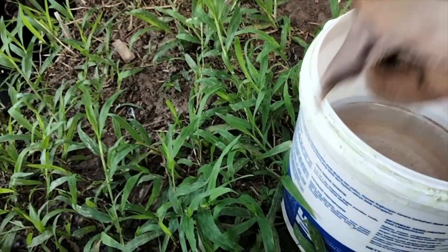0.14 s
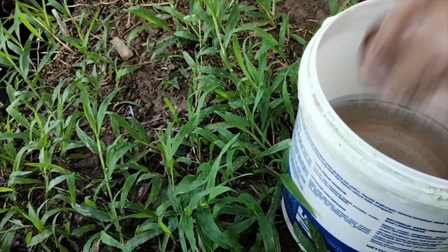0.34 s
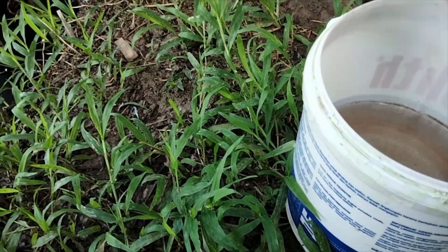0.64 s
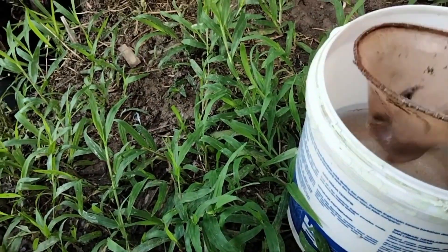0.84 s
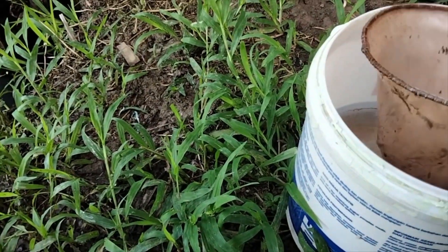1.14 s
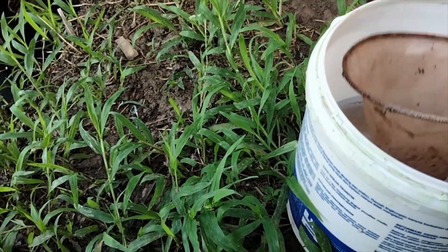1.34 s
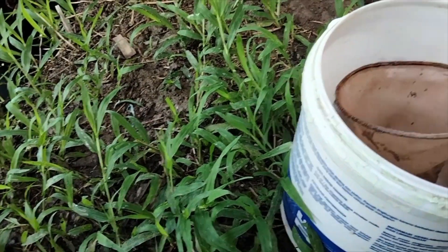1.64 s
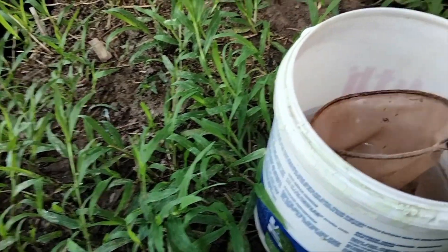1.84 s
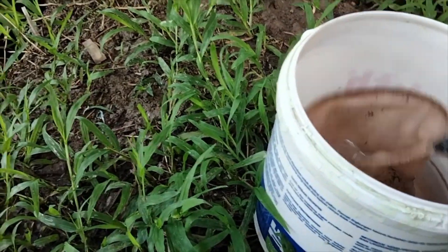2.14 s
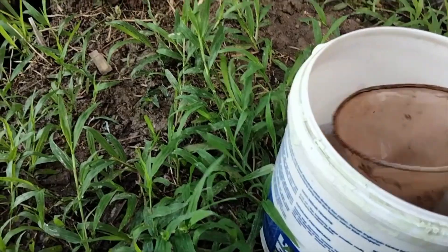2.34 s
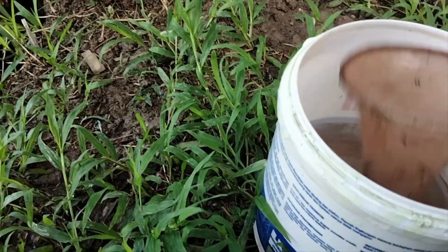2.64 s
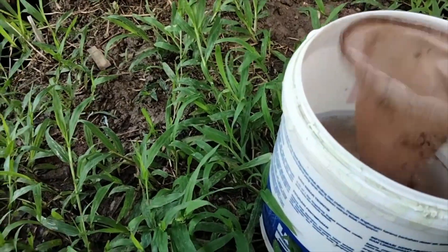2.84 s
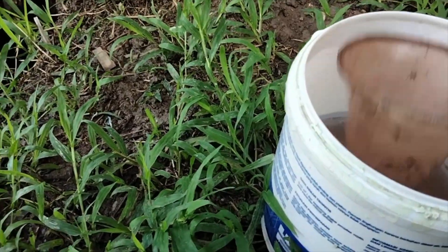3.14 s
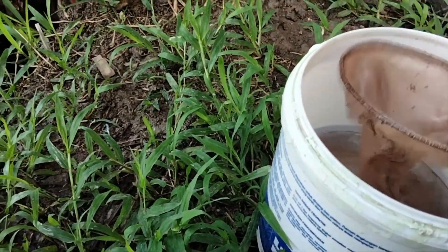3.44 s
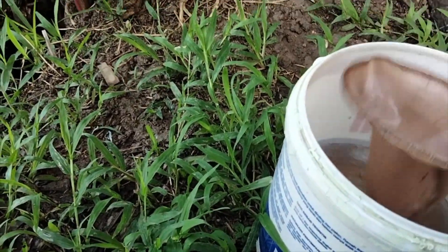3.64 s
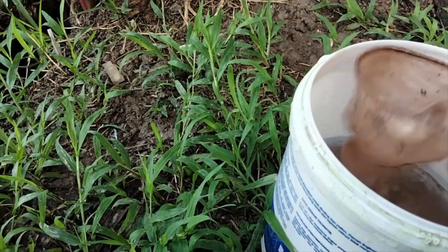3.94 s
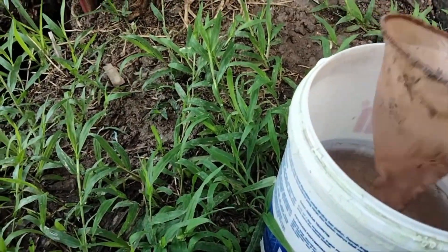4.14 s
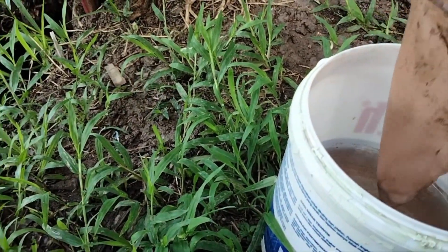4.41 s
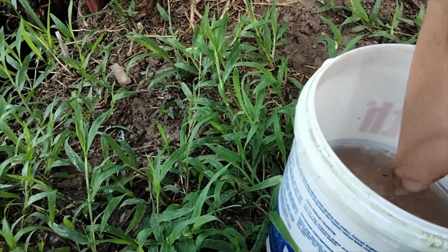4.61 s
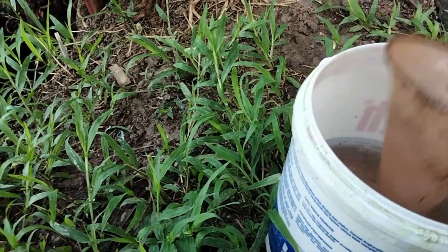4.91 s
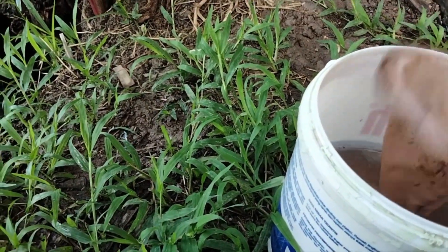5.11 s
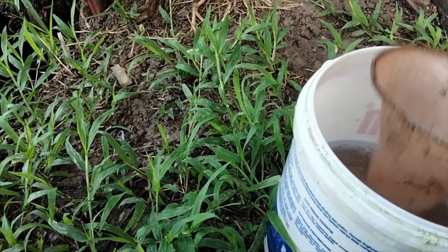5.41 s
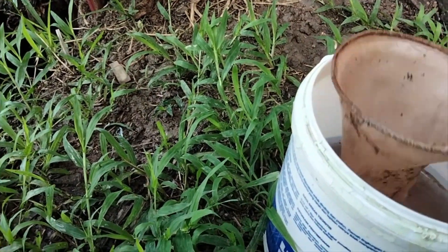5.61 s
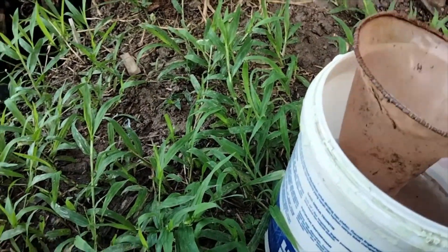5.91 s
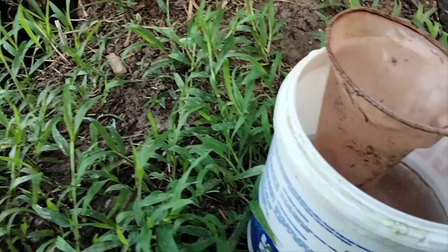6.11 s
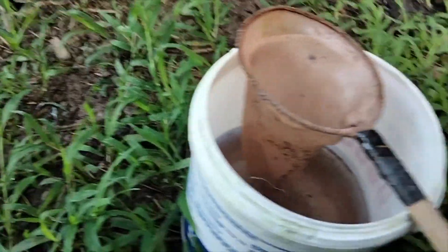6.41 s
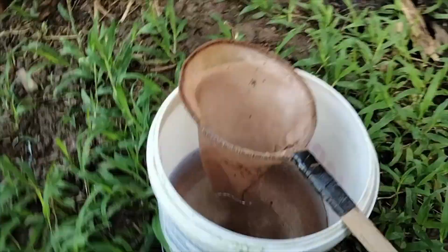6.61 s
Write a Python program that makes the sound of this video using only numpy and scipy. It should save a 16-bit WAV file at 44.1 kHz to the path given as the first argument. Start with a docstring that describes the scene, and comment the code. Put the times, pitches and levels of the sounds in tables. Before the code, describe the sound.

Dry wooden knocks with a slight plastic boom come in uneven clusters, strongest early, just before three seconds and near five. Bright little water ticks and rising plinks fill the middle, with grainy wet rustling. A shrill cicada chorus never stops; a closer singer pulses about seven times a second, then cuts out. Low far traffic lies beneath. Close, mono, open-air phone sound with brittle treble, ending in a thin watery hiss.

```python
"""Net in a plastic bucket, cicadas around

Outdoors, close to the microphone, a fine-mesh net on a wooden handle is dipped and shaken in a plastic bucket.
The handle knocks on the rim as decaying modes and noise bursts; drops tick off the mesh as rising plinks and
spray; the wet cloth rustles and scuffs as grainy noise. Cicadas, shaped noise and tymbal clicks, buzz all around,
one close and throbbing, over the low noise of far traffic. A mono phone microphone with a treble resonance.
"""
import sys
import numpy as np
from scipy import signal
from scipy.fft import rfft, irfft, next_fast_len
from scipy.io import wavfile
from scipy.ndimage import uniform_filter1d, map_coordinates

SR = 44100
rng = np.random.default_rng(int(sys.argv[2]) if len(sys.argv) > 2 else 0)


def wav_record(signal):
    """Record a signal, one row per channel, as 16-bit PCM in the file named by sys.argv[1]."""
    frames = np.transpose(np.atleast_2d(signal))
    bounded = np.clip(frames, -1, 1)
    # unit amplitude maps onto the largest positive 16-bit level
    quanta = np.round(bounded * 32767).astype(np.int16)
    wavfile.write(sys.argv[1], SR, quanta)


N = 297884

# Handle on the rim. Each row: start in seconds, wall thud in dB, bending mode 1 in dB, mode 2 in dB,
# share of mode 2 across the edge (0-1), mode 3 in dB, crack in dB.
RIM_KNOCKS = [(0.138, -107, -71, -63, 0.8, -48.5, -70), (0.339, -38, -28.5, -20, 1, -26, -42.5),
              (0.387, -58, -40, -40.5, .99, -48, -73), (0.782, -58, -42.5, -60, 0.5, -69, -68),
              (0.812, -48, -44, -70, .6, -68, -56), (2.102, -55.5, -42.5, -98, .85, -45, -68),
              (2.157, -48, -37, -66, .1, -40, -45.5), (2.204, -61, -59, -53, .98, -45, -57),
              (2.301, -41.5, -34, -33, 0.64, -37, -44.5), (2.639, -78, -46.5, -61, .75, -72, -64),
              (2.671, -78, -53, -53, 0.9, -49, -71), (2.717, -51.5, -33.5, -40, 0.97, -45, -57),
              (2.83, -58, -45, -42, 0.6, -42, -68), (2.874, -31.5, -26.5, -20.5, 0.73, -34, -41),
              (2.976, -71, -54, -51, .8, -51, -71), (3.258, -54.5, -40.5, -51, 0.9, -46, -56.5),
              (3.328, -76, -52, -53, .98, -42.5, -57), (3.36, -92, -47, -62, .8, -75, -68),
              (3.807, -36.5, -33.5, -36, 0.95, -20.5, -43.5), (3.823, -41.5, -32, -21, 0.96, -27, -37.5),
              (3.911, -43.5, -40.5, -29, 1, -20, -60.5), (4.73, -83.5, -83, -67.5, 0.7, -42, -58),
              (4.776, -33, -18.5, -15, 0.93, -17.5, -28.5), (4.954, -38.5, -28, -22, 0.93, -28, -42.5),
              (5.126, -36, -23.5, -17, 0.6, -43, -27), (5.172, -53, -32.5, -32.5, 0.25, -56, -36),
              (5.274, -36, -20, -19, 1, -24, -26.5), (5.752, -53, -51, -64, 0.1, -73, -59)]
# Bending modes of the handle: 1, 2 flat, 2 across the edge, 3. Each row: frequency in Hz, t60 in seconds.
HANDLE_MODES = [(474, 0.059), (1140, 0.059), (1250, 0.036), (2020, 0.012)]
# The bucket wall's own modes. Each row: frequency in Hz, t60 in seconds, level in dB.
WALL_MODES = [(236.4, 0.08, -0.8), (952, 0.026, -1)]
# Dull push of the plastic wall. Each row: frequency in Hz, level in dB.
THUD_SPECTRUM = [(200, -1.5), (350, -14.5), (800, -7), (1500, -14), (2500, -20)]
# Crack of the contact. Each row: frequency in Hz, level in dB.
CRACK_SPECTRUM = [(1200, -24.5), (1900, -3.5), (2700, 0), (3400, 0.5), (4100, 3), (4900, -2.5),
                  (5800, -8.5), (7400, -2), (11000, -30)]
# Treble of the crack, also the mist of a drop. Each row: frequency in Hz, level in dB.
SNAP_SPECTRUM = [(4300, -29), (5600, -1), (6500, -2), (8000, 1), (12000, -6.5), (16000, -1.5)]
WALL_DB, WALL_GROWS = -47.5, .4  # wall modes at a thud of -50 dB; dB per dB of thud
SNAP_DB, SNAP_GROWS, SNAP_LEAST_DB = -49.5, 2.33, -58  # snap at a crack of -40 dB; dB per dB of crack; softest
TICK_DB = 4  # first contact over the crack

# Drops flicked off the mesh. Each row: start in seconds, level in dB, starting pitch in Hz, mist in dB.
MESH_DROPS = [(0.362, -58, 6540, -50.5), (0.7366, -54.5, 4450, -53.5), (0.8015, -47.5, 3900, -53),
              (0.867, -59, 3600, -70), (1.1401, -76, 6480, -70), (1.345, -64, 5000, -72),
              (1.359, -65, 4520, -72), (1.374, -54, 1520, -73), (1.4, -72, 6000, -69),
              (1.415, -73, 6000, -72), (1.4682, -60, 4410, -65), (1.585, -52.5, 5000, -55),
              (1.593, -63, 4050, -64), (1.811, -45, 4370, -54), (1.926, -71, 6000, -66),
              (2.376, -51.5, 2370, -65), (2.437, -45.5, 3800, -55), (2.5148, -56.5, 1530, -72),
              (2.5625, -40.5, 3850, -49), (2.7117, -38, 3900, -50.5), (2.811, -49, 6540, -53),
              (2.991, -56, 5370, -58), (3.048, -45.5, 3320, -57), (3.09, -59, 3260, -72),
              (3.119, -54.5, 1730, -62), (3.4204, -43.5, 3340, -55), (3.47, -57, 2330, -76),
              (3.503, -67, 4000, -72), (3.558, -57, 2490, -70), (3.583, -63, 3000, -72),
              (3.6297, -42.5, 3880, -60), (3.6727, -55, 3450, -70), (3.6945, -50.5, 1970, -65),
              (3.7107, -56, 5770, -54), (3.761, -60, 5800, -59), (3.9092, -44.5, 2550, -73),
              (3.978, -55, 2960, -63), (4.4752, -72, 6000, -70), (4.72, -54, 2000, -63)]
# Spray of drops and strokes. Each row: frequency in Hz, level in dB.
SPRAY_SPECTRUM = [(800, -8), (1700, -2), (2800, -3), (4000, -3.5), (6500, -7), (10000, -3), (16000, -32)]
PLINK_DB, SPRAY_DB = -2, -8.5  # parts of a drop, relative to its level

# Wet net dragged over the rim. Each row: start in seconds, length in seconds, handle in dB, cloth in dB, fizz in dB.
RIM_SCUFFS = [(0.286, 0.065, -71, -74, -67.5), (0.338, 0.057, -61.5, -66.5, -67),
              (0.74, 0.032, -77, -66, -68), (0.775, 0.06, -72, -59.5, -66), (0.936, 0.026, -70.5, -78, -76),
              (1.49, 0.086, -89, -69.5, -68), (1.852, .1, -76, -71, -71), (2.316, 0.017, -89, -68, -65),
              (2.355, 0.036, -84, -73, -64), (2.794, 0.031, -71, -63.5, -60.5),
              (2.89, 0.078, -89, -67.5, -69), (3.14, 0.026, -72.5, -69, -66.5),
              (3.27, 0.025, -82, -65.5, -67), (3.347, 0.03, -71, -69.5, -70),
              (3.69, 0.041, -68.5, -64.5, -59), (3.735, 0.013, -81, -74, -63),
              (3.856, 0.065, -71, -65.5, -69), (3.908, 0.061, -69, -67, -70), (4.863, 0.021, -65, -88, -83),
              (5.045, 0.029, -69.5, -85, -78), (5.2, 0.039, -78, -74, -69), (5.577, 0.12, -73.5, -75, -72),
              (5.669, 0.15, -76, -75.5, -63.5), (5.922, 0.023, -89, -73.5, -65.5)]
SCUFF_TAIL_S, SCUFF_DROPS_DB = .028, -5  # draining time after a stroke; droplets thrown, relative to the cloth

# Soft short tones from the water. Each row: start in seconds, length in seconds, frequency in Hz, level in dB.
WATER_TONES = [(.742, 0.032, 3020, -70), (1.372, 0.016, 1120, -65), (2.143, .02, 2100, -66),
               (4.719, 0.02, 1770, -62), (5.526, 0.11, 592, -75), (5.632, 0.031, 1960, -66.5),
               (5.747, 0.036, 597, -47.5), (5.836, 0.065, 586, -72.5), (6.065, 0.018, 768, -66)]
TRICKLE_DB = -2.5  # smallest droplets, relative to the rustle's body

# Thin squeals that rise as the wet mesh drains.
# Each row: start in seconds, length in seconds, from Hz, to Hz, level in dB.
MESH_SQUEALS = [(6.13, .03, 13800, 15700, -77), (6.135, .035, 12400, 13700, -76),
                (6.135, .025, 11300, 12200, -77), (6.165, .095, 13750, 14050, -72),
                (6.255, .07, 14000, 15800, -64), (6.27, .08, 13300, 15500, -67),
                (6.3, .05, 12900, 14300, -68)]
# Faint wavering whistles, perhaps a far bird.
# Each row: start in seconds, length in seconds, from Hz, to Hz, level in dB.
FAR_WHISTLES = [(2.402, 0.027, 3070, 3100, -77), (2.46, 0.034, 3360, 3150, -70),
                (2.537, 0.046, 3150, 3400, -78), (2.628, 0.032, 3280, 3290, -70),
                (2.648, 0.026, 3150, 2900, -72), (2.945, .04, 3120, 3100, -75),
                (3.026, 0.052, 3050, 2990, -75), (3.195, 0.039, 3000, 2780, -73),
                (4.505, 0.07, 3190, 3300, -83), (4.663, 0.043, 3250, 3260, -83)]
DRAIN_SQUEAL_DB = -13  # random squeals, relative to the fizz

# Wet mesh. Each row: time in seconds, body in dB, fizz in dB.
MESH_RUSTLE = [(0.0, -78, -76), (0.9, -77, -78), (1.35, -79.5, -75), (1.52, -76.5, -73), (2.29, -74, -75),
               (2.86, -70.5, -76), (3.14, -77.5, -73), (3.31, -77.5, -77.5), (3.83, -75, -73.5),
               (3.98, -90, -86.5), (4.12, -78, -78), (4.75, -79.5, -77.5), (4.94, -73, -75),
               (5.17, -73.5, -74), (5.34, -76, -77), (6.03, -80, -86), (6.13, -75.5, -70),
               (6.45, -72, -55.5), (6.75, -67, -58)]
# Body of the rustle. Each row: frequency in Hz, level in dB.
CLOTH_SPECTRUM = [(250, 6), (450, 7), (1000, -3), (2000, -2), (4000, -5), (6500, -5.5), (9000, 1),
                  (12000, -43)]
# Fizz of water in the mesh. Each row: frequency in Hz, level in dB.
FIZZ_SPECTRUM = [(6000, -13), (9000, -2), (11500, -5), (13500, -8), (16000, -0.5)]
WASH_DB = -13.5  # a lower wash of water, relative to the fizz

# Near cicada's throbs. Each row: start in seconds, top level in dB; the last row ends the throbs.
NEAR_THROBS = [(2.46, -58), (2.6, -54), (2.7, -53.5), (2.845, -52.5), (2.97, -51.5), (3.105, -51),
               (3.235, -50.5), (3.38, -48.5), (3.51, -49), (3.655, -48.5), (3.8, -49), (3.935, -50.5),
               (4.085, -48.5), (4.219, -48), (4.364, -48.5), (4.52, -47), (4.665, -49), (4.825, -48.5),
               (4.98, -49), (5.11, -49.5), (5.245, -52), (5.375, -67.5)]
# Shape of a throb. Each row: part of the throb (0-1), gain (0-1).
THROB_SHAPE = [(0, .04), (.07, .08), (.16, .55), (.55, .85), (.78, 1), (.88, .1), (1, .04)]
# Near cicada's tymbal. Each row: time in seconds, clicks a second.
NEAR_CLICK_RATE = [(3.2, 124.5), (5.3, 119)]
# Near cicada's voice. Each row: frequency in Hz, level in dB.
NEAR_SPECTRUM = [(7780, -30), (7900, -7), (8300, -1), (8700, 2), (9100, -8), (10000, -36)]
# A narrow shrill singer. Each row: time in seconds, level in dB.
SHRILL_LEVEL = [(0, -61), (.4, -54.5), (1.5, -54.5), (2.4, -58.5), (2.8, -66.5), (5.3, -64), (5.6, -61.5)]
# Shrill singer's voice. Each row: frequency in Hz, level in dB.
SHRILL_SPECTRUM = [(8500, -24), (8900, -3), (9080, 0), (9300, -5), (9700, -24)]
# A lower singer. Each row: time in seconds, level in dB.
LOW_LEVEL = [(0, -71), (.2, -76), (.55, -72), (.9, -79), (1.2, -78), (1.9, -77.5), (2.5, -79), (4.2, -75.5),
             (4.6, -71.5), (5.2, -77.5), (6.75, -81)]
# Lower singer's voice. Each row: frequency in Hz, level in dB.
LOW_SPECTRUM = [(6300, -30), (6800, -8.5), (7050, -3), (7400, 0.5), (8000, -10.5)]
# Far cicada chorus. Each row: time in seconds, level in dB.
CHORUS_LEVEL = [(0.0, -52), (0.49, -53.5), (1.56, -51), (1.73, -51.5), (2.76, -53), (4.63, -52.5),
                (5.92, -52.5), (6.75, -53)]
# Voice of the chorus. Each row: frequency in Hz, level in dB.
CHORUS_SPECTRUM = [(7300, -39), (7700, -21), (8240, -7.5), (8900, 3), (9500, -3.5), (10000, -7.5),
                   (10700, -22), (11500, -43.5)]
SHRILL_CLICKS, SHRILL_THROBS, SHRILL_START_S = 121, 7.05, 1.2  # a second, a second, start of one throb
CLEAN_DB = 2  # steady tymbal clicks over their noisy part

# Far traffic. Each row: frequency in Hz, level in dB.
TRAFFIC_SPECTRUM = [(12, -33.5), (20, -6.5), (48, -0.5), (81, -10), (174, -12), (220, -17), (254, -19.5),
                    (293, -22.5), (312, -30), (390, -38), (422, -49), (450, -37), (580, -83), (990, -120)]
# A faint thin tone. Each row: time in seconds, frequency in Hz, level in dB.
THIN_TONE = [(5.3, 1335, -91), (6.1, 1300, -93), (6.16, 1290, -77.5), (6.39, 1275, -76), (6.45, 1270, -85),
             (6.7, 1260, -75), (6.76, 1250, -105)]
DEEP_DB, UPPER_DB, SPLIT_HZ = -52, -58.5, 92.4  # traffic below and above the split

# Microphone port resonance: frequency in Hz, width in Hz, level in dB.
MIC_PORT = (8900, 1100, 10)
TOP_HZ = 15900  # near the middle of the microphone's final treble slope


def amp(db):
    """Decibels to linear gain."""
    return 10 ** (np.asarray(db) / 20)


def unit(x):
    """Scale a sound to an rms of 1."""
    return x / np.sqrt(np.mean(x ** 2) + 1e-20)


def along(points, hz):
    """Read (Hz, dB) points on a log axis, falling away outside."""
    f, db = np.transpose(points)
    return np.interp(np.log(hz + 1), np.log(f + 1), db, left=-120, right=-120)


def curves(rows):
    """One value per sample for each column after the time."""
    s, *columns = np.transpose(rows)
    return [np.interp(np.arange(N) / SR, s, column) for column in columns]


def wobble(rate):
    """A smooth random curve, rate knots a second."""
    knots = rng.standard_normal(int(N * rate / SR) + 4)
    return map_coordinates(knots, [np.arange(N) * rate / SR])


def filtered(x, response):
    """Multiply the spectrum of x by a response of frequency."""
    m = next_fast_len(N + SR // 2)
    return irfft(rfft(x, m) * response(np.fft.rfftfreq(m, 1 / SR)), m)[..., :N]


def noise(spectrum, grain_db=0., patchy_db=0.):
    """Coloured noise of rms 1; grain_db makes it crackle, patchy_db gives it patches of random gain."""
    crackle = rng.standard_normal(N) * amp(grain_db * wobble(900))
    z = signal.stft(crackle, nperseg=256)[2]
    over_pitch = uniform_filter1d(rng.standard_normal(z.shape), 4, 0)
    patches = unit(uniform_filter1d(over_pitch, 16, 1))
    grains = signal.istft(z * amp(patchy_db * patches), nperseg=256)[1][:N]
    return unit(filtered(grains, lambda hz: amp(along(spectrum, hz))))


def add(track, s, sound):
    """Mix a short sound in at time s."""
    part = track[round(s * SR):][:len(sound)]
    part += sound[:len(part)]


def puffs(times, levels_db, attack, t60, tail_db, tail_t60):
    """Envelope of noise bursts: a quick decay and a weak tail off the bucket walls; times in seconds."""
    t, env = np.arange(SR // 6) / SR, np.zeros(N)
    decay = amp(-60 * t / t60) + amp(tail_db - 60 * t / tail_t60)
    shape = decay * (1 - np.exp(-t / attack))
    for s, db in zip(times, levels_db):
        add(env, s, amp(db) * shape)
    return env


def port(x):
    """Close sharp sounds excite the resonance of the microphone port."""
    c, w, db = MIC_PORT
    return filtered(x, lambda f: 1 + amp(db) * 1j * f * w / (c * c - f * f + 1j * f * w))


def knocks():
    """The handle rings in its bending modes; wall and contact add a boom, a thud and a crack."""
    rows, t, ringing = np.array(RIM_KNOCKS), np.arange(SR // 6) / SR, np.zeros(N)
    rises = [0.0035, 0.0027, 0.0019, .0012, 0.0017, 0.0014]  # s, one per mode
    # handle and wall modes vary a little at random from knock to knock
    detune = 1 + 0.019 * rng.standard_normal((len(rows), 6))
    for (s, thud_db, first_db, second_db, edge, third_db, _), shift in zip(rows, detune):
        shares = np.clip([1 - edge, edge], 1e-3, 1)
        flat_db, edge_db = second_db + 10 * np.log10(shares)
        wall_db = WALL_DB + WALL_GROWS * (thud_db + 50)
        levels = [first_db, flat_db, edge_db, third_db] + [wall_db + db for *_, db in WALL_MODES]
        for (hz, t60, *_), db, k, rise in zip(HANDLE_MODES + WALL_MODES, levels, shift, rises):
            decay = amp(db - 60 * t / t60) * (1 - np.exp(-t / rise))
            add(ringing, s, decay * np.sin(2 * np.pi * hz * k * t))
    times, thud_db, crack_db = rows[:, 0], rows[:, 1], rows[:, 6]
    snap_db = np.maximum(SNAP_DB + SNAP_GROWS * (crack_db + 40), SNAP_LEAST_DB)
    thud = noise(THUD_SPECTRUM) * puffs(times, thud_db, 0.00097, 0.045, -15.0, 0.15)
    crack = noise(CRACK_SPECTRUM) * puffs(times, crack_db, 0.00038, 0.017, -23, 0.11)
    snap = noise(SNAP_SPECTRUM) * puffs(times, snap_db, 0.00016, 0.008, -20.5, 0.081)
    tick = noise(SPRAY_SPECTRUM) * puffs(times, crack_db + TICK_DB, .00005, 0.0023, -60, 0.012)
    return ringing + thud + crack + tick + port(snap)


def drops():
    """Each drop is a short damped plink in a puff of spray."""
    rows, t, plinks = np.array(MESH_DROPS), np.arange(SR // 30) / SR, np.zeros(N)
    fade = amp(-60 * t / .012)
    for s, db, hz, _ in rows:
        rising = np.sin(2 * np.pi * hz * t * (1 + 8 * t))  # a bubble rises in pitch
        add(plinks, s, amp(db + PLINK_DB) * fade * rising)
    times, level_db, mist_db = rows[:, 0], rows[:, 1], rows[:, 3]
    spray = noise(SPRAY_SPECTRUM) * puffs(times, level_db + SPRAY_DB, 0.00058, 0.022, -12.5, 0.14)
    mist = noise(SNAP_SPECTRUM) * puffs(times, mist_db, 0.00017, 0.038, -30.0, 0.086)
    return plinks + spray + port(mist)


def strokes():
    """Gains of handle, cloth and fizz: each stroke swells, then drains away."""
    gains = np.zeros((3, N))
    for s, length, *levels_db in RIM_SCUFFS:
        stroke = signal.windows.tukey(round(length * SR), .7)
        for gain, db in zip(gains, levels_db):
            add(gain, s, amp(db) * stroke)
    keep = np.exp(-1 / (SCUFF_TAIL_S * SR))
    return [np.maximum(g, signal.lfilter([1 - keep], [1, -keep], g)) for g in gains]


def handle_response(f):
    """Sum of the handle's resonances, each narrower the longer it rings."""
    total = 0
    for (hz, t60), gain in zip(HANDLE_MODES, amp([4, -10.0, -1.5, -5.5])):
        total = total + 1j * f * 300 / (hz * hz - f * f + 1j * f * 4.5 / t60) * gain
    return total


def scuffs():
    """Ragged rubbing drives the handle's modes, the cloth and a fizz of water."""
    handle, cloth, fizz = strokes()
    ragged = amp(0.88 * wobble(110) + 2.2 * wobble(60))
    wood = filtered(handle * ragged * noise(THUD_SPECTRUM), handle_response)
    rubbed_cloth = cloth * noise(SPRAY_SPECTRUM, patchy_db=3.5)
    water = fizz * noise(FIZZ_SPECTRUM, grain_db=5.0)
    return wood + ragged * (rubbed_cloth + water)


def bubbles():
    """Soft tones that swell and fade, and tiny random droplets that follow the rustle and the strokes."""
    water = np.zeros(N)
    for s, length, hz, db in WATER_TONES:
        t = np.arange(round(length * SR)) / SR
        add(water, s, amp(db) * np.hanning(len(t)) * np.sin(2 * np.pi * hz * t))
    t = np.arange(SR // 40) / SR
    level = amp(curves(MESH_RUSTLE)[0] + TRICKLE_DB) + amp(SCUFF_DROPS_DB) * strokes()[1]
    when, pitch, size, life = rng.random((round(400 * N / SR), 4)).T  # 400 droplets a second
    pitches_hz = 500 * 11 ** pitch ** 1.2
    sizes_db = -3 * np.log(size + 0.033)  # few are loud
    for s, hz, db, cycles in zip(when * N / SR, pitches_hz, sizes_db, 0.7 + 7 * life ** 2):
        fade = np.exp(-t * hz / cycles) * (1 - np.exp(-t * hz / 1.1))
        rising = np.sin(2 * np.pi * hz * t * (1 + 6 * t))
        add(water, s, level[int(s * SR)] * amp(db) * fade * rising)
    return water


def glides():
    """Thin sliding whistles and squeals that waver and break up; random squeals, most falling, follow the fizz."""
    air, fizz_db = np.zeros(N), curves(MESH_RUSTLE)[1]
    waver_hz, breaks = 45 * wobble(120), amp(2 * wobble(110))
    when, pitch, slide, life = rng.random((round(70 * N / SR), 4)).T  # 70 squeals a second
    start_hz = 10500 + 5000 * pitch
    end_hz = start_hz + 250 - 900 * slide
    drain_db = fizz_db[(when * N).astype(int)] + DRAIN_SQUEAL_DB
    drains = zip(when * N / SR, 0.019 + .03 * life, start_hz, end_hz, drain_db)
    for s, length, from_hz, to_hz, db in MESH_SQUEALS + FAR_WHISTLES + list(drains):
        glide_hz = np.linspace(from_hz, to_hz, round(length * SR))
        phase = 2 * np.pi * np.cumsum(glide_hz) / SR + rng.random() * 2 * np.pi
        add(air, s, amp(db) * signal.windows.tukey(len(glide_hz), .6) * np.sin(phase))
    shift = np.exp(2j * np.pi * np.cumsum(waver_hz) / SR)  # moves every tone by the same tens of Hz
    return breaks * np.real(signal.hilbert(air, next_fast_len(N))[:N] * shift)


def rustle():
    """Wet mesh drags and drains: grainy noise that flutters."""
    body_db, fizz_db = curves(MESH_RUSTLE)
    flutter = wobble(25)
    body_gain = amp(body_db + 2.7 * flutter + 0.98 * wobble(40))
    fizz_gain = amp(fizz_db + 0.67 * flutter + 0.69 * wobble(40))
    body = noise(CLOTH_SPECTRUM, grain_db=1.5, patchy_db=3.0)
    wash = amp(WASH_DB) * noise(SPRAY_SPECTRUM, grain_db=0.5)
    return body_gain * body + fizz_gain * (noise(FIZZ_SPECTRUM, grain_db=2.0) + wash)


def tymbal(rate, spectrum, depth, sharp):
    """Clicks at a nearly steady rate: lines from their repeat, plus noise that peaks once per click."""
    jitter = 1 + .002 * wobble(12) + .0025 * wobble(120)
    phase = 2 * np.pi * np.cumsum(rate * jitter) / SR
    lines = sum(np.cos(k * phase + .06 * k * k) for k in range(60, 82))  # harmonics of the click rate
    clicks = unit(filtered(lines, lambda hz: amp(along(spectrum, hz))))
    depth = np.clip(depth, 0, 1)
    gate = unit(1 - depth + depth * ((1 + np.cos(phase)) / 2) ** sharp)
    return unit(amp(CLEAN_DB + 1.3 * wobble(83)) * clicks + gate * noise(spectrum))


def cicadas():
    """A blurred chorus, a shrill and a lower singer, and a near one whose throbs swell slowly and stop short."""
    t, throb = np.arange(N) / SR, np.transpose(THROB_SHAPE)
    far = amp(curves(CHORUS_LEVEL)[0] + 0.54 * wobble(17)) * noise(CHORUS_SPECTRUM)
    swell = .35 + np.interp((t - SHRILL_START_S) * SHRILL_THROBS % 1, *throb)
    shrill_voice = tymbal(SHRILL_CLICKS, SHRILL_SPECTRUM, 0.35, sharp=2.0)
    shrill = amp(curves(SHRILL_LEVEL)[0]) * swell * shrill_voice
    low = amp(curves(LOW_LEVEL)[0] + 4.1 * wobble(3.3)) * noise(LOW_SPECTRUM, patchy_db=3.5)
    starts, top_db = np.transpose(NEAR_THROBS)
    place = np.interp(t, starts, np.arange(len(starts)))  # number of the throb plus the part passed
    level = amp(top_db[place.astype(int)] + 0.36 * wobble(11)) * np.interp(place % 1, *throb)
    near = level * tymbal(curves(NEAR_CLICK_RATE)[0], NEAR_SPECTRUM, 0.69, sharp=2.2)
    return far + shrill + low + near


def background():
    """Distant traffic rumble, two bands of noise that waver apart, and a faint wavering tone."""
    road = noise(TRAFFIC_SPECTRUM)
    deep = filtered(road, lambda f: 1 / (1 + (f / SPLIT_HZ) ** 6))
    deep_gain = amp(DEEP_DB + 1.5 * wobble(7.7) + 0.96 * wobble(1.5))
    upper_gain = amp(UPPER_DB + 0.64 * wobble(7))
    rumble = deep_gain * unit(deep) + upper_gain * unit(road - deep)
    hz, db = curves([(5, 1340, -120)] + THIN_TONE)  # near silent up to 5 s
    phase = 2 * np.pi * np.cumsum(hz + 8 * wobble(30)) / SR
    return rumble + amp(db + 3.3 * wobble(23)) * np.sin(phase)


def scene():
    """Everything at the microphone, the same in both channels."""
    bucket = knocks() + drops() + scuffs() + bubbles() + glides() + rustle()
    mono = bucket + cicadas() + background()
    return np.array([mono, mono])


def record(dry):
    """The phone keeps nothing above its band limit, 100 Hz over TOP_HZ."""
    return filtered(dry, lambda hz: np.clip((TOP_HZ + 100 - hz) / 300, 0, 1) ** 2)


dry = scene()
out = record(dry)
wav_record(out)
```